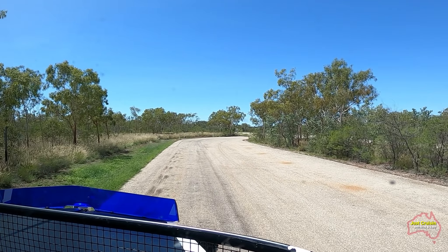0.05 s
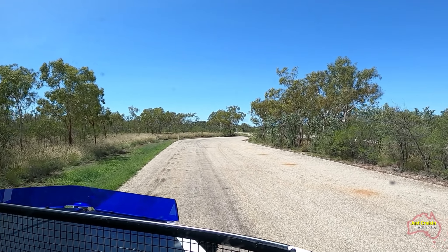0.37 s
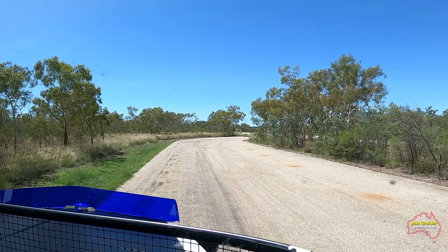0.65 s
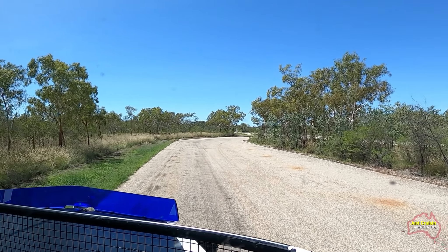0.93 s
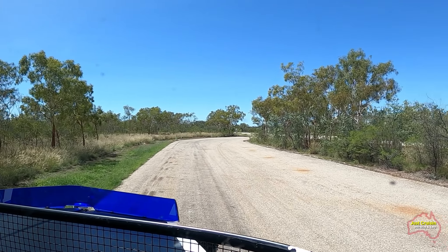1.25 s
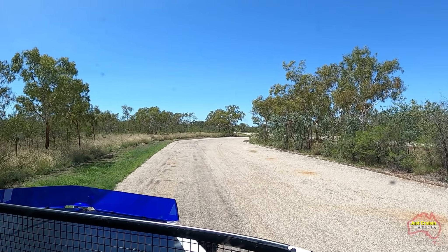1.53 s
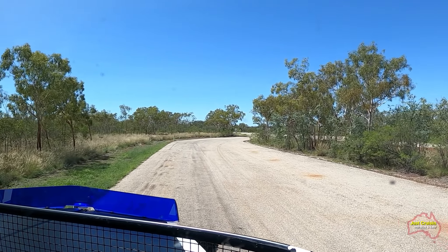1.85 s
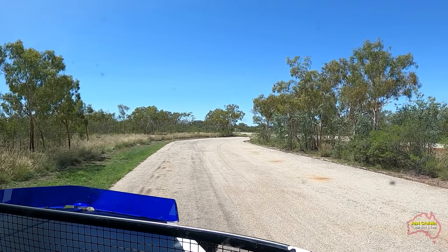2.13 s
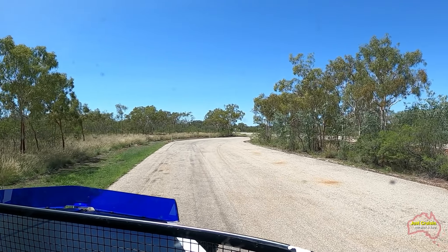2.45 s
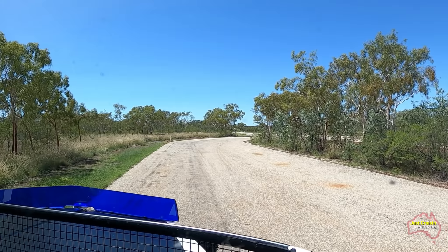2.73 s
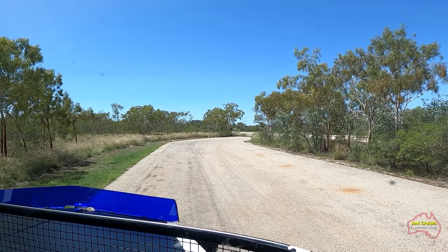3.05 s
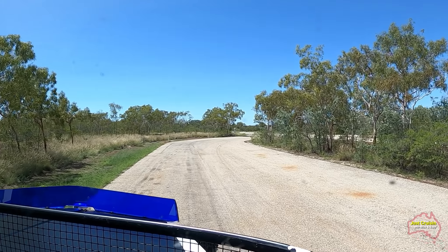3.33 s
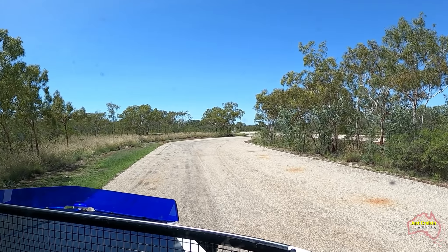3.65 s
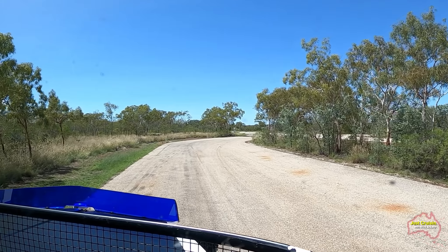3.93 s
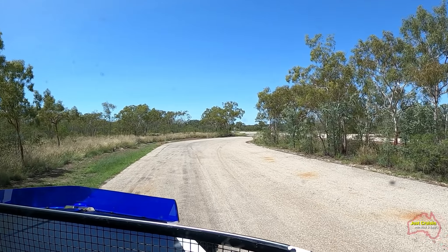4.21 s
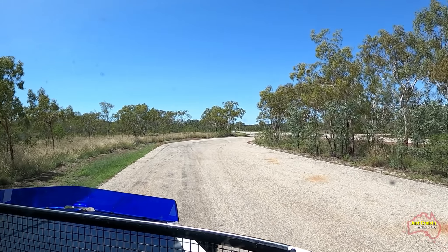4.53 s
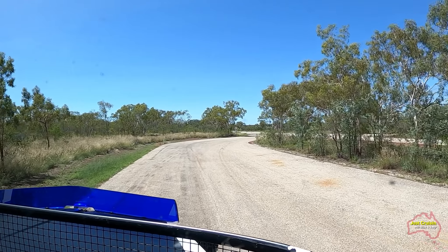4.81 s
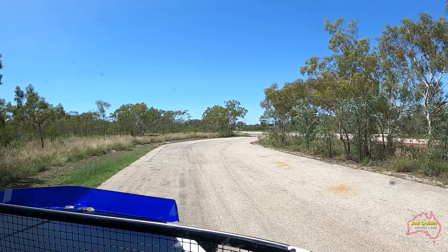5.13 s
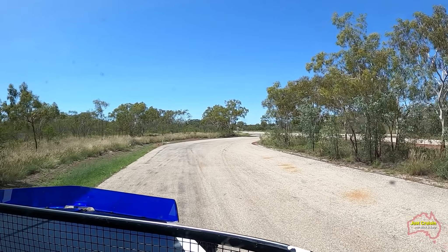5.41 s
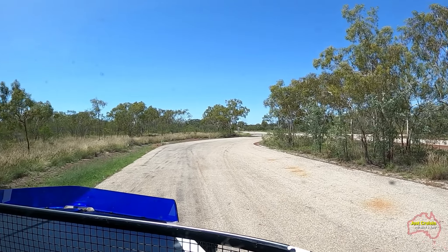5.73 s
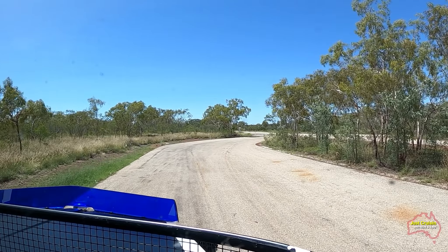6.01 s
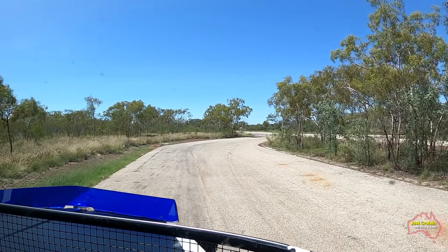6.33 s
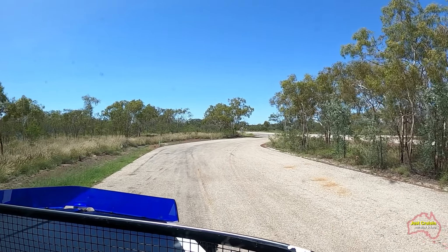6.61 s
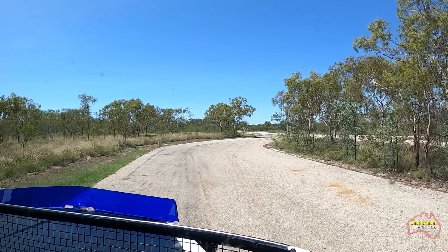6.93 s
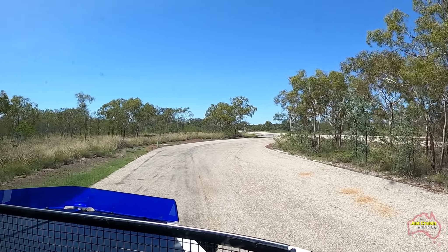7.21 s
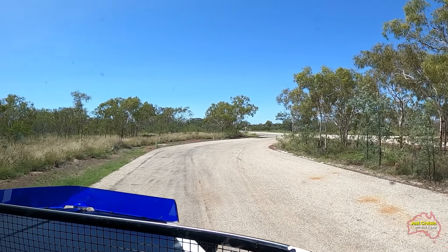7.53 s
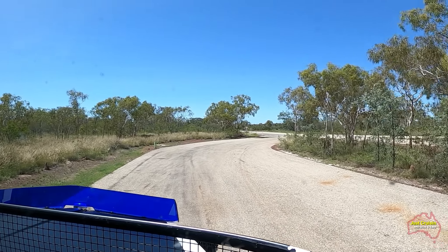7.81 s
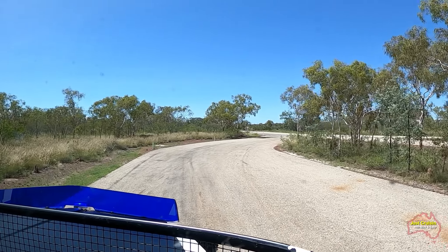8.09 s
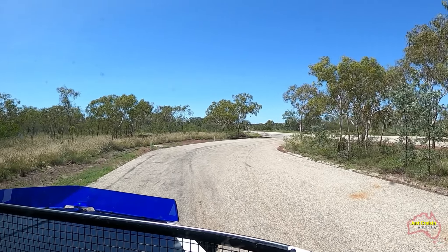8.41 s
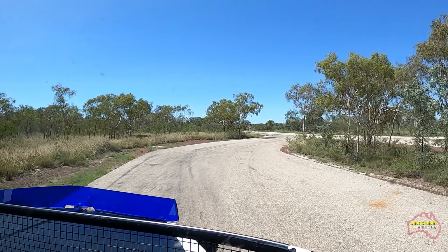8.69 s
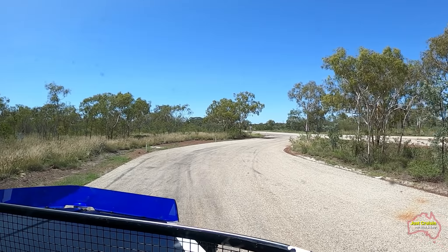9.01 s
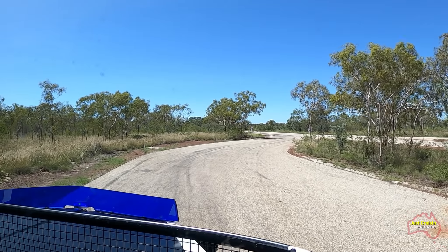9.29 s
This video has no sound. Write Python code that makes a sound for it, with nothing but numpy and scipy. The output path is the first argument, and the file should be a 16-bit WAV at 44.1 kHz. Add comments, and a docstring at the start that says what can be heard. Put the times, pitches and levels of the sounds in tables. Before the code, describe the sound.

Inside a moving truck, the diesel engine pulls, drops in revs twice and settles, over road rumble and a faint turbo whistle.

```python
"""A six-cylinder diesel truck pulls along a country road, heard from the cab.
The engine revs up, eases off for a gear change, pulls again and settles to a cruise.
Its firings drone in the exhaust, boom in the cab and clatter in the block; the fan hums.
The turbo whistles up and down and air hisses in the intake.
Tyres roar, bumps thud and the cab shudders on its mounts."""
import sys
import numpy as np
from scipy import signal
from scipy.fft import rfft, irfft, next_fast_len
from scipy.io import wavfile
from scipy.ndimage import uniform_filter1d

SR = 44100
rng = np.random.default_rng(int(sys.argv[2]) if len(sys.argv) > 2 else 0)


def pcm_store(signal):
    """Save signal as 16-bit PCM."""
    levels = np.round(np.clip(np.atleast_2d(signal), -1, 1) * 32767)
    wavfile.write(sys.argv[1], SR, levels.astype(np.int16).T)


N = 412335
TIME_S = np.arange(N) / SR
BINS_HZ = np.fft.rfftfreq(N, 1 / SR)

# Engine speed. Each row: time in seconds, firing rate in Hz.
ENGINE_SPEED = [(0, 71.5), (.3, 74), (.8, 80.5), (1, 82.3), (1.2, 83.2), (1.35, 82.5), (2, 71), (2.4, 65),
                (3, 62), (3.4, 62.5), (4, 65.5), (5, 74.5), (5.5, 78.2), (6, 81), (6.35, 82), (7.4, 62.5),
                (8, 60), (9.35, 60.6)]
# Exhaust pulse strength, and the roar that trails it. Each row: time in seconds, dB re full pull.
THROTTLE = [(0, 0), (1.35, -1.5), (1.6, -7.5), (2.05, -12.5), (2.6, -27), (2.85, -5.5), (3.15, -20),
            (3.45, -2.5), (3.7, -0.5), (6.3, -1), (6.55, -12), (7.3, -14), (7.6, -11), (7.95, -15),
            (8.25, -1), (8.7, -2), (9.1, 2.5), (9.35, -1)]
LOAD = [(0, -1.5), (.5, 0.5), (1.5, 0), (2.3, -7.5), (2.62, -15), (2.85, -9), (3.25, -20), (3.75, -1),
        (4.3, -2.5), (5.1, 2), (6.3, 0), (6.8, -12.5), (7.3, -8), (7.6, 1), (7.95, -11), (8.25, -5.5),
        (8.7, -11), (9.2, 2.5)]
# Level laws. Each: dB at full pull and REF_FIRING_HZ, dB per dB of control, dB per Hz of firing rate.
THROB_LAW, FAN_LAW = (-22.5, 0.57, 0.86), (-19, 0.69, 0)
BOOM_LAW, CLATTER_LAW = (-17, 0.36, 0.092), (-22.5, 0.39, 0.1)
HISS_LAW, SPRAY_LAW = (-44, 0.33, 0.019), (-51.5, 0.37, 0.15)
REF_FIRING_HZ = 82
# Throb partials. Each row: multiple of the four-stroke cycle rate, relative level in dB.
THROB_ORDERS = [(3, -6), (8, -10), (9, -4.5), (10, 2.5), (11, -14), (13, -8.5), (15, -7)]
# Strength of each cylinder in dB, in firing order.
CYLINDERS_DB = [6.5, -2, 6.5, 5.5, 5.5, -1]

# Resonances that the tones sweep through. Each row: centre in Hz, width in Hz, relative peak in dB.
EXHAUST_MODES = [(59.6, 6, -22.5), (68.9, 7.9, -16), (81.7, 5, -22), (129.4, 4.6, -18.5), (141.4, 7.3, -17),
                 (151.8, 7.3, -13), (196.3, 9.9, -20.5), (238.3, 4.5, -23)]
BURBLE_MODES = [(106, 12, -29)]
FAN_MODES = [(303.9, 8.5, -3), (319.3, 12.6, -2.5), (345, 10, -4), (356.3, 13.3, 0.5)]
WHISTLE_MODES = [(4330, 50, -58), (4805, 100, -48), (5290, 130, -52), (5600, 540, -62), (6170, 160, -56),
                 (6550, 350, -57), (6860, 100, -49), (7100, 60, -49)]
# Cab and engine bay resonances. Each row: centre in Hz, width in Hz, lift in dB.
CAB_MODES = [(156.4, 11.3, 5), (239, 23, 2), (307.3, 7.5, 5.5), (378, 16, 6), (469, 60, 6), (558, 21, 4.5),
             (675, 33, 5), (794, 37, 3), (891, 66, 2.5), (1219, 100, 6.5), (1480, 51, 5.5), (2000, 570, 6),
             (2730, 420, 3.5), (4730, 150, 4.5), (8200, 300, 2.5), (12500, 350, 3)]
# Noise spectra. Each row: frequency in Hz, relative density in dB.
BOOM_SPECTRUM = [(15, -19), (35, -16), (60, -2), (85, -5), (110, -3.5), (150, 0), (200, -0.5), (300, -2),
                 (400, -7.5), (520, -14), (800, -50), (2000, -66)]
CLATTER_SPECTRUM = [(150, -35), (350, -1), (480, 0.5), (620, -1), (900, -1.5), (1080, -6.5), (1400, -10),
                    (1750, -16), (2400, -22.5), (3200, -20.5), (4400, -29), (6000, -29.5), (9000, -51),
                    (16000, -58)]
HISS_SPECTRUM = [(1500, -4.5), (3000, -4), (4500, -2.5), (5800, -2), (7200, 2), (8400, 0.5), (10000, -1.5),
                 (11500, -5), (12700, -18), (15600, -28)]
SPRAY_SPECTRUM = [(6000, -20), (10500, -4), (12500, 2), (14000, -1), (15600, -5.5)]
TYRE_SPECTRUM = [(40, -20), (110, -0.5), (155, 19), (220, 9), (400, 1.5), (850, -4.5), (1500, -10),
                 (2300, -12.5), (3400, -21), (5000, -33), (12000, -59)]
THUD_SPECTRUM = [(20, -5), (45, 2), (170, -3), (330, -7), (700, -25), (2000, -45), (8000, -90)]
SWAY_SPECTRUM = [(1, -5), (5, -6), (10, 5), (16, 4.5), (25, -3), (40, -30), (80, -46), (300, -78)]

# Turbo speed, rising under load. Each row: time in seconds, whistle pitch in Hz.
TURBO_SPEED = [(0, 5700), (.45, 6200), (1.05, 6780), (1.3, 6860), (1.6, 6300), (2.05, 5280), (2.36, 4780),
               (3.1, 4300), (3.55, 4680), (4.58, 6180), (5.2, 6760), (5.95, 7180), (6.36, 7090),
               (6.63, 6200), (7.06, 5270), (7.34, 4820), (8, 4390), (9.35, 4340)]
# Intake air. Each row: time in seconds, breathy pitch in Hz, its gain in dB, duct tone level in dB.
INTAKE_AIR = [(0, 6940, -48, -52), (1.15, 6690, -49.5, -53), (1.55, 5360, -59, -61), (1.8, 5200, -70, -64),
              (2.4, 5100, -68, -68), (2.55, 5280, -57, -70), (3.0, 6000, -51, -54), (3.4, 6900, -56, -58),
              (3.85, 7000, -48.5, -48.5), (5, 6820, -50, -56), (6.25, 6870, -51, -54),
              (6.6, 6000, -68, -65), (7.28, 5200, -68, -69), (7.42, 5450, -50, -57), (7.95, 6100, -51, -49),
              (8.8, 6350, -57, -64), (9.35, 6300, -48, -49)]
# Air escaping after the turbo winds down. Each row: peak time in seconds, width in seconds, level in dB.
AIR_RUSHES = [(2.6, 0.88, -52.5), (7.7, 0.71, -48.5)]

# Tyre roar, growing with road speed. Each row: time in seconds, level in dB.
TYRE_LEVEL = [(0, -30), (2.5, -30), (7, -26.5), (9.35, -25)]
# Body modes shaken by the road. Each row: centre in Hz, width in Hz, relative level in dB.
BODY_MODES = [(24, 10, -26), (51.5, 8.6, -30.5), (91.9, 18.5, -33.5)]
# Road bumps. Each row: start in seconds, peak level in dB, length in seconds (twice the rise time).
BUMPS = [(1.996, -13.5, 0.035), (7.294, -17, 0.045), (7.58, -22, 0.045)]
# Uneven stretches of road. Each row: peak time in seconds, width in seconds, shudder level in dB.
UNDULATIONS = [(1.65, .4, -13.5), (2.43, 0.39, -10), (3.06, 0.28, -11), (4.1, 0.45, -16.5), (5.65, .7, -26),
               (6.6, 0.56, -13.5), (7.294, 0.31, -12.5), (7.82, 0.29, -11), (8.45, 0.44, -12.5),
               (9.3, 0.37, -12.5)]


def exhaust(firings):
    """The firing note and two overtones swell across resonances; unequal cylinders add a throb."""
    firing_hz, = curves(ENGINE_SPEED)
    throttle_db, = curves(THROTTLE)
    drone = 0
    for k in (1, 2, 3):
        resonance_db = humps_db(k * firing_hz, EXHAUST_MODES, floor_db=-34)
        drone += tone(k * firings, throttle_db + resonance_db, waver_db=0.4, slip_rad=0.08)
    cycles = firings / len(CYLINDERS_DB)
    throb_db = effort_db(THROB_LAW, THROTTLE)
    throb = sum(tone(k * cycles, throb_db + db, waver_db=1.2, slip_rad=0.15) for k, db in THROB_ORDERS)
    return drone + throb


def burble(firings):
    """As the revs fall the wheels drive the engine; the exhaust burbles at 1.5 times the firing rate."""
    firing_hz, = curves(ENGINE_SPEED)
    overrun = uniform_filter1d(slowing(firing_hz, full_hz_per_s=14), size=SR // 10)
    level_db = humps_db(1.5 * firing_hz, BURBLE_MODES, floor_db=-35)
    return overrun * tone(1.5 * firings, level_db, waver_db=2, slip_rad=0.4)


def combustion(firings, pulse_depth, repeat_share):
    """Noise that swells once a firing; a share of its power repeats every four-stroke cycle."""
    cylinders = len(CYLINDERS_DB)
    bursts = gain_of(CYLINDERS_DB)[firings.astype(int) % cylinders] * np.sin(np.pi * (firings % 1))
    pattern = rng.standard_normal(4096)
    repeating = pattern[(firings / cylinders % 1 * len(pattern)).astype(int)]
    noise = np.sqrt(repeat_share) * repeating + np.sqrt(1 - repeat_share) * rng.standard_normal(N)
    return (1 + pulse_depth * bursts) * noise


def engine_roar(firings):
    """Firings shake the cab (boom), knock in the block (clatter) and ripple the air (hiss)."""
    cab_db = sum(db / (1 + (2 * (BINS_HZ - hz) / width_hz) ** 2) for hz, width_hz, db in CAB_MODES)
    boom = coloured(combustion(firings, pulse_depth=0.4, repeat_share=0.15), BOOM_SPECTRUM, cab_db)
    clatter = coloured(combustion(firings, pulse_depth=0.12, repeat_share=0.31), CLATTER_SPECTRUM, cab_db)
    hiss = coloured(combustion(firings, pulse_depth=0.076, repeat_share=0.089), HISS_SPECTRUM, cab_db)
    spray = coloured(rng.standard_normal(N), SPRAY_SPECTRUM, cab_db)  # fine, unpulsed air noise
    return (gain_of(effort_db(BOOM_LAW, LOAD) + 0.73 * drift(12)) * boom
            + gain_of(effort_db(CLATTER_LAW, LOAD) + 0.58 * drift(12)) * clatter
            + gain_of(effort_db(HISS_LAW, LOAD) + 0.64 * drift(35)) * hiss
            + gain_of(effort_db(SPRAY_LAW, LOAD) + 0.6 * drift(35)) * spray)


def fan(firings, blades_per_firing=4.378):
    """The belt-driven fan hums in step with the engine, louder with throttle and on a resonance."""
    blade_hz = blades_per_firing * curves(ENGINE_SPEED)[0]
    level_db = effort_db(FAN_LAW, THROTTLE) + humps_db(blade_hz, FAN_MODES, floor_db=-18)
    return tone(blades_per_firing * firings, level_db, waver_db=2, slip_rad=0.2)


def turbo():
    """Compressor blades whistle, louder on pipework resonances and while coasting down."""
    hz, = curves(TURBO_SPEED)
    turns = np.cumsum(hz * (1 + 0.0015 * drift(160))) / SR
    whistle = 0.71 * tone(turns, 0, waver_db=2, slip_rad=0.57) + 0.55 * breathy(hz, width_hz=58)
    coast_db = 2.5 * slowing(hz, full_hz_per_s=1500)
    whistle_db = humps_db(hz, WHISTLE_MODES, floor_db=-65) + coast_db
    octave_db = -62 + 110 * np.log10(hz / hz.max())  # only near full boost
    return gain_of(whistle_db) * whistle + gain_of(octave_db) * breathy(2 * hz, width_hz=230)


def intake():
    """Drawn air sings in the intake and, lower, in the duct."""
    air_hz, air_db, duct_db = curves(INTAKE_AIR)
    air = 1.1 * gain_of(air_db + 1.2 * drift(22)) * breathy(air_hz, width_hz=600)
    duct = gain_of(duct_db) * breathy(hz=4025, width_hz=270)
    return air + duct


def air_rush():
    """A wide band of escaping air swells twice, once the turbo has wound down."""
    level_db = humps_db(TIME_S, AIR_RUSHES, floor_db=-56) + 1.4 * drift(35)
    return gain_of(level_db) * breathy(hz=8790, width_hz=3500)


def road():
    """Tyres roar, the rough road shakes the body's low modes, and single bumps thud."""
    tyre_db = curves(TYRE_LEVEL)[0] + 1.9 * drift(16)
    tyres = gain_of(tyre_db) * coloured(rng.standard_normal(N), TYRE_SPECTRUM)
    shake = sum(gain_of(db) * breathy(hz, width_hz) for hz, width_hz, db in BODY_MODES)
    strain = gain_of(2.1 + 0.14 * curves(LOAD)[0])  # more shake while the engine pulls
    jolts = np.zeros(N)
    for start_s, db, length_s in BUMPS:
        age = 2 * np.maximum(TIME_S - start_s, 0) / length_s
        jolts += gain_of(db) * age * np.exp(1 - age)
    thuds = jolts * coloured(rng.standard_normal(N), THUD_SPECTRUM)
    return tyres + strain * shake + thuds


def shudder(rock_hz=10.6):
    """Uneven road rocks the cab on its mounts, over a looser sway."""
    rocking = tone(rock_hz * TIME_S, 0, waver_db=0.5, slip_rad=0.48)
    sway = coloured(rng.standard_normal(N), SWAY_SPECTRUM)
    return gain_of(humps_db(TIME_S, UNDULATIONS, floor_db=-30)) * unit_rms(rocking + 0.5 * sway)


def whine(hz=15661):
    """A very faint high whine."""
    return tone(hz * TIME_S, level_db=-71, waver_db=2.5, slip_rad=0.4)


def gain_of(db):
    """Decibels to an amplitude factor."""
    return 10 ** (np.asarray(db) / 20)


def unit_rms(x):
    """Scales to rms 1."""
    return x / np.sqrt(np.mean(x ** 2) + 1e-20)


def curves(rows):
    """Each column after the time column, interpolated to every sample."""
    times_s, *columns = np.transpose(rows)
    return [np.interp(TIME_S, times_s, column) for column in columns]


def effort_db(law, control):
    """Level of a layer from its control table and the engine speed."""
    full_db, db_per_db, db_per_hz = law
    offset_hz = curves(ENGINE_SPEED)[0] - REF_FIRING_HZ
    return full_db + db_per_db * curves(control)[0] + db_per_hz * offset_hz


def humps_db(x, rows, floor_db):
    """Level along x of bell-shaped peaks (centre, half-power width, dB) over a floor."""
    power = sum(gain_of(db) ** 2 * 0.5 ** ((2 * (x - centre) / width) ** 2) for centre, width, db in rows)
    return 10 * np.log10(power + gain_of(floor_db) ** 2)


def slowing(hz, full_hz_per_s):
    """How fast a frequency curve falls, 0 to 1."""
    return np.clip(-np.gradient(hz) * SR / full_hz_per_s, 0, 1)


def drift(rate_hz):
    """Random curve of rms 1 with rate_hz knots a second."""
    knots = rng.standard_normal(N // 32)
    return unit_rms(np.interp(TIME_S * rate_hz, np.arange(len(knots)), knots))


def tone(turns, level_db, waver_db, slip_rad):
    """A sine that wavers in level and slips in phase."""
    amplitude = np.sqrt(2) * gain_of(level_db + waver_db * drift(14))
    return amplitude * np.sin(2 * np.pi * (turns + rng.random()) + slip_rad * drift(11))


def breathy(hz, width_hz):
    """Noise of rms 1 in a resonance at hz, a number or a curve."""
    pole = np.exp(-np.pi * width_hz / SR)
    noise = rng.standard_normal(N) + 1j * rng.standard_normal(N)
    baseband = signal.lfilter([1], [1, -2 * pole, pole * pole], noise)
    carrier = np.exp(2j * np.pi * np.cumsum(hz * np.ones(N)) / SR)
    return unit_rms((baseband * carrier).real)


def coloured(x, spectrum, lift_db=0):
    """Filters x by a spectrum plus lift_db, then scales to rms 1."""
    hz, db = np.transpose(spectrum)
    shape = gain_of(np.interp(np.log(BINS_HZ + 1), np.log(hz + 1), db) + lift_db)
    size = next_fast_len(N)
    response = np.interp(np.fft.rfftfreq(size, 1 / SR), BINS_HZ, shape)
    return unit_rms(irfft(rfft(x, size) * response, size)[:N])


def scene():
    """Engine, air, road and cab, in mono."""
    firing_hz = curves(ENGINE_SPEED)[0] * (1 + 0.002 * drift(18))
    firings = np.cumsum(firing_hz) / SR  # running count
    high_whine = whine()
    engine = exhaust(firings) + burble(firings) + fan(firings) + engine_roar(firings)
    air = turbo() + intake() + air_rush()
    return (engine + air + road() + shudder() + high_whine)[None]


def record(dry, ceiling=0.95, cutoff_hz=15750):
    """Soft clip, then low-pass."""
    rounded = dry / (1 + (abs(dry) / ceiling) ** 8) ** (1 / 8)
    lowpass = signal.firwin(1023, cutoff_hz, window=("kaiser", 9), fs=SR)
    return signal.oaconvolve(rounded, lowpass[None], "same")


dry = scene()
out = record(dry)
pcm_store(out)
```